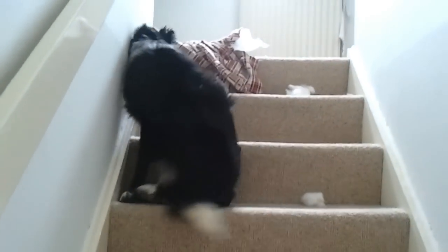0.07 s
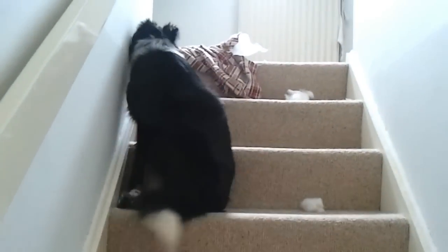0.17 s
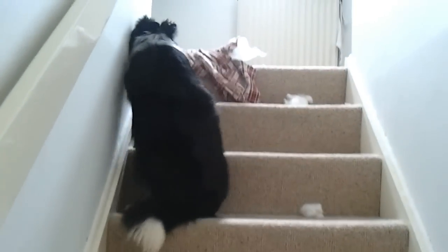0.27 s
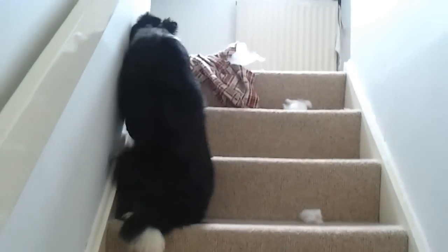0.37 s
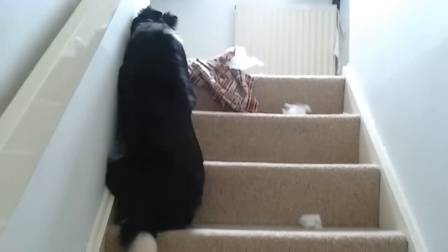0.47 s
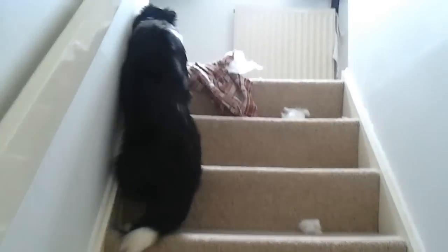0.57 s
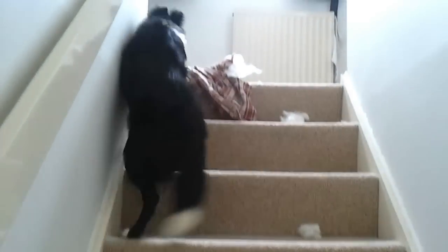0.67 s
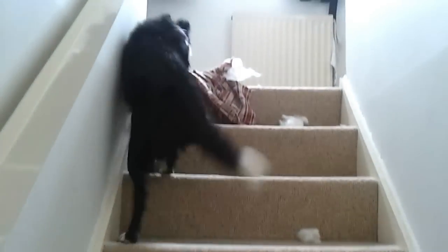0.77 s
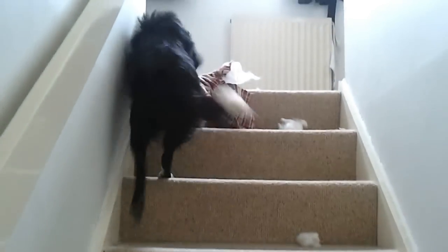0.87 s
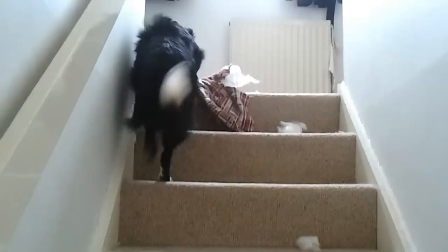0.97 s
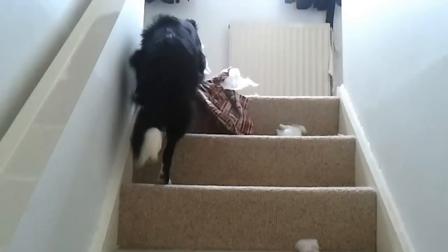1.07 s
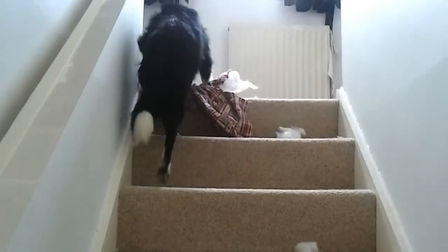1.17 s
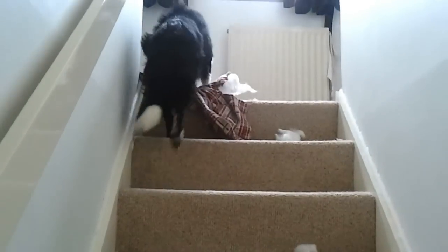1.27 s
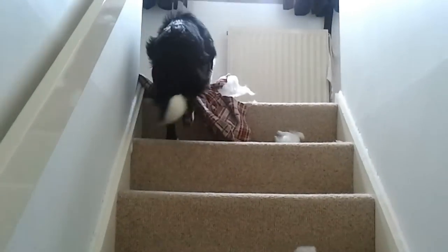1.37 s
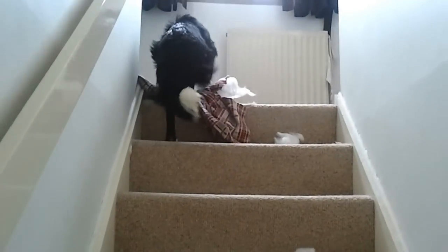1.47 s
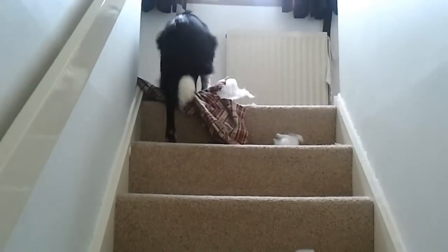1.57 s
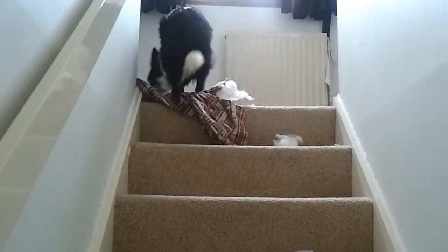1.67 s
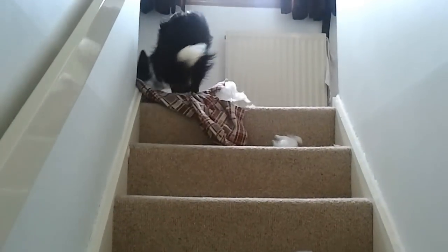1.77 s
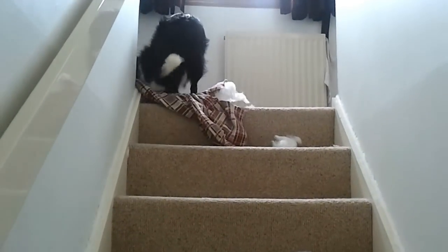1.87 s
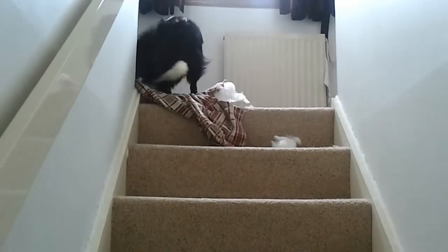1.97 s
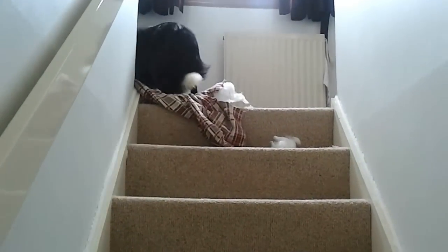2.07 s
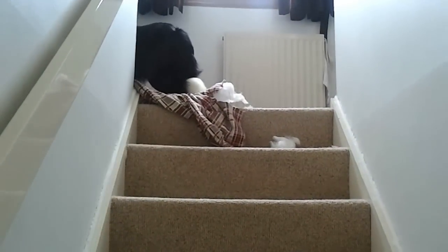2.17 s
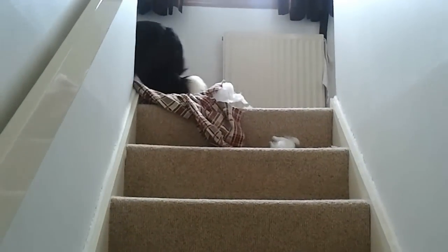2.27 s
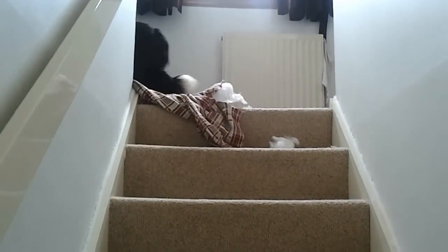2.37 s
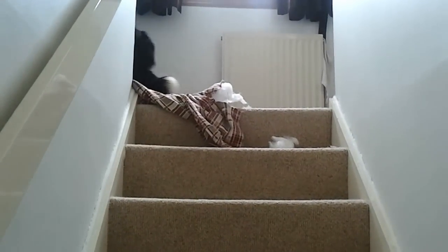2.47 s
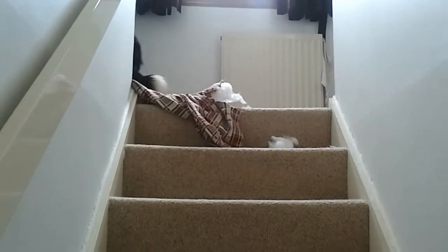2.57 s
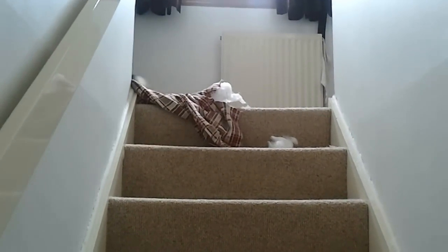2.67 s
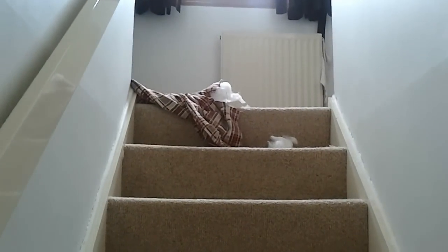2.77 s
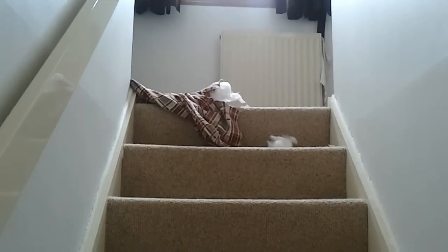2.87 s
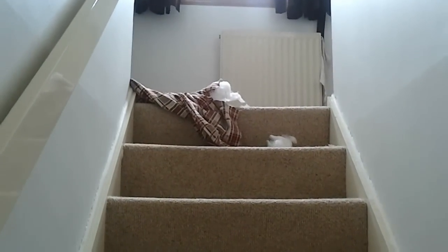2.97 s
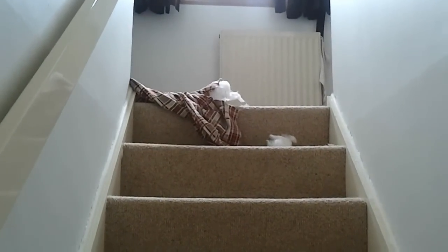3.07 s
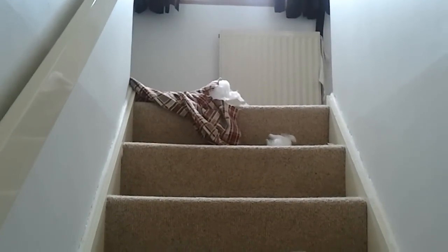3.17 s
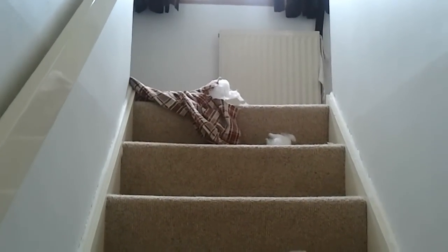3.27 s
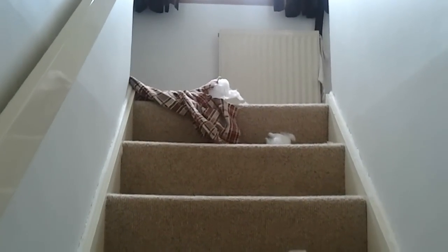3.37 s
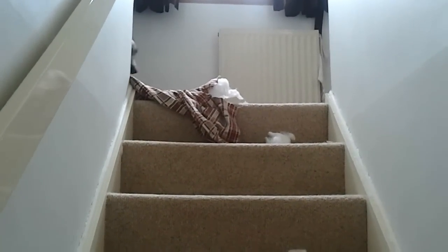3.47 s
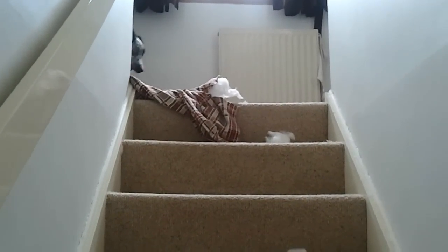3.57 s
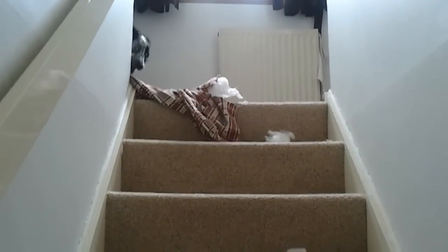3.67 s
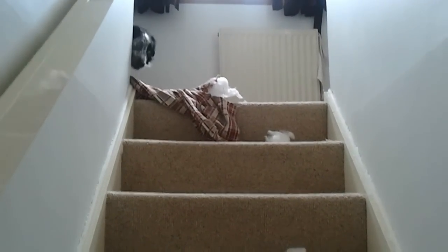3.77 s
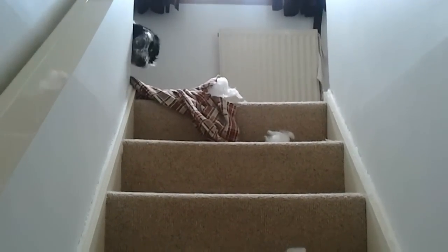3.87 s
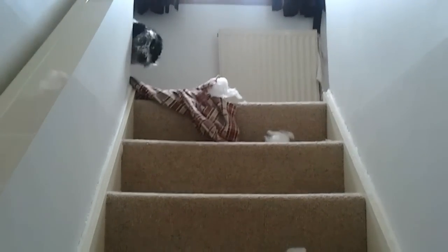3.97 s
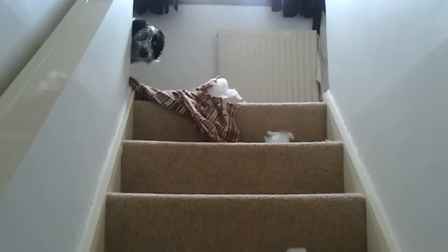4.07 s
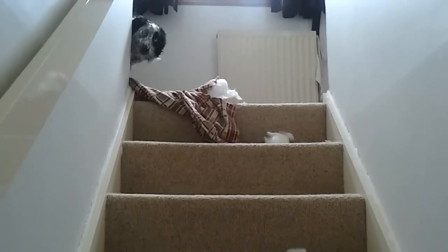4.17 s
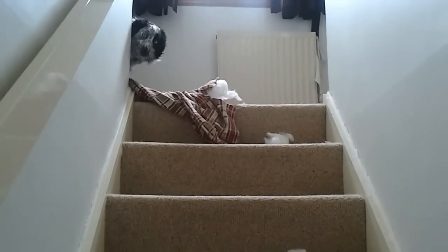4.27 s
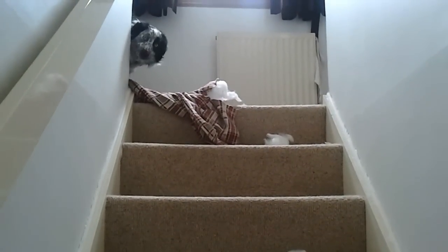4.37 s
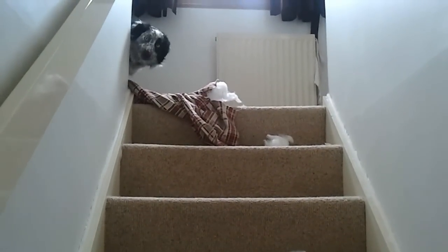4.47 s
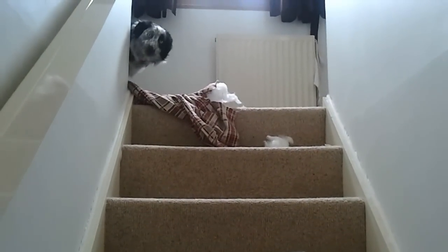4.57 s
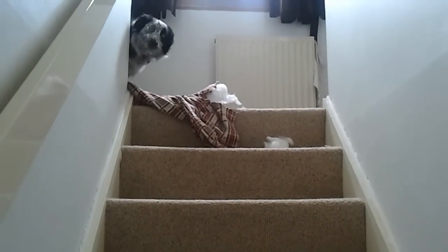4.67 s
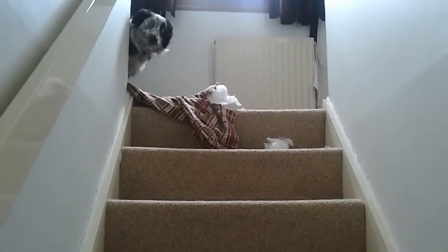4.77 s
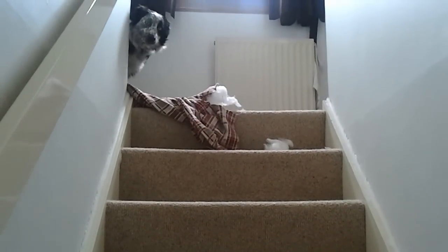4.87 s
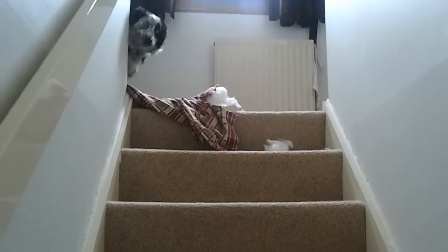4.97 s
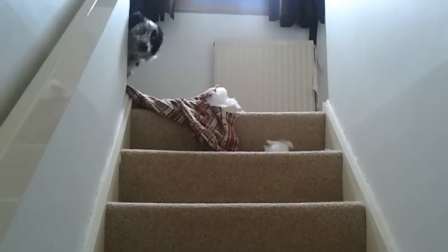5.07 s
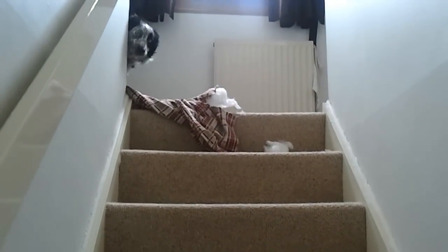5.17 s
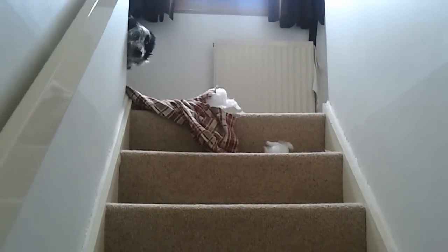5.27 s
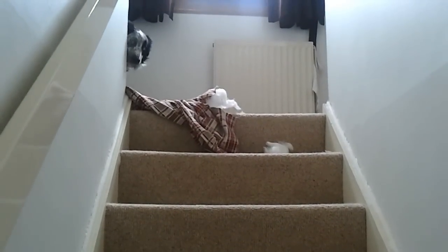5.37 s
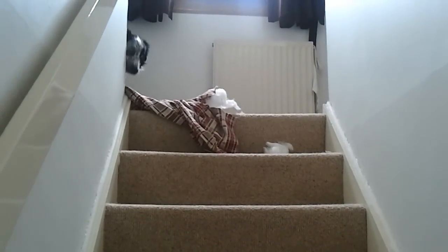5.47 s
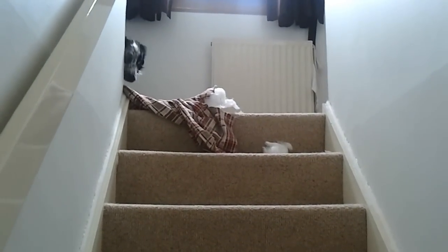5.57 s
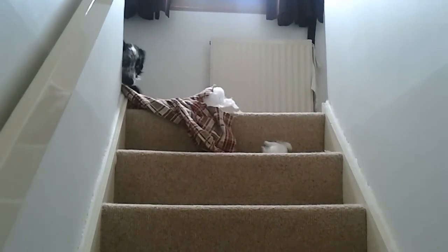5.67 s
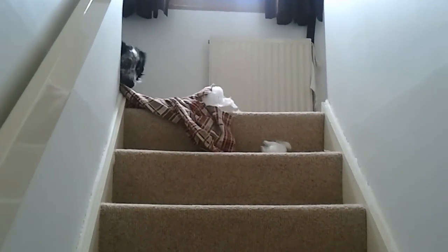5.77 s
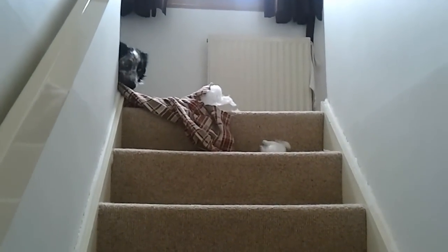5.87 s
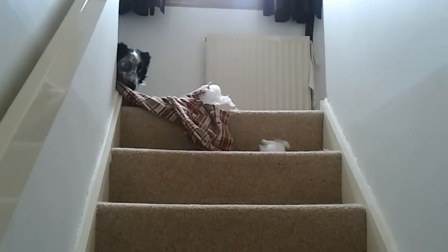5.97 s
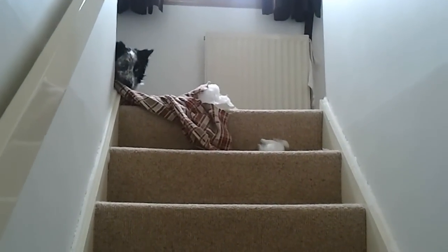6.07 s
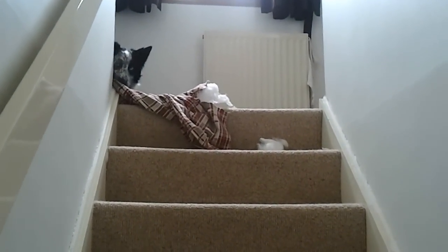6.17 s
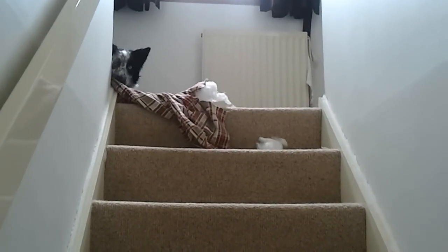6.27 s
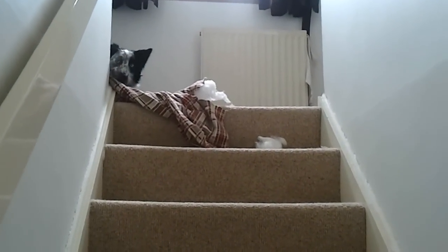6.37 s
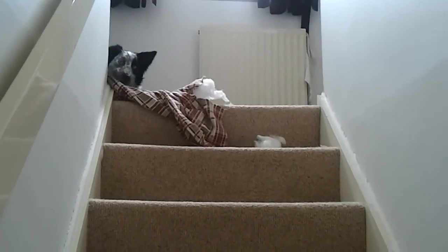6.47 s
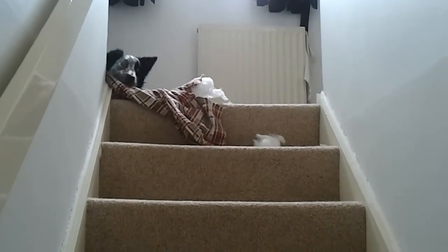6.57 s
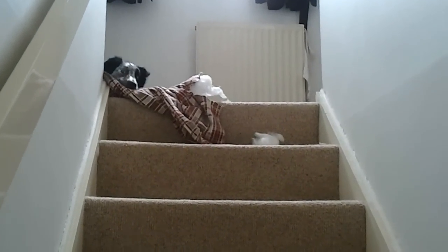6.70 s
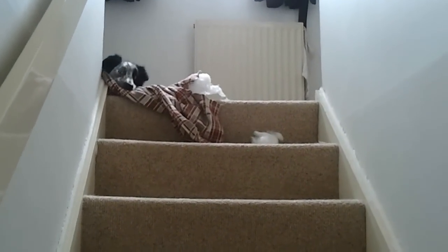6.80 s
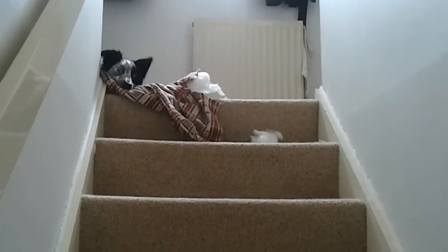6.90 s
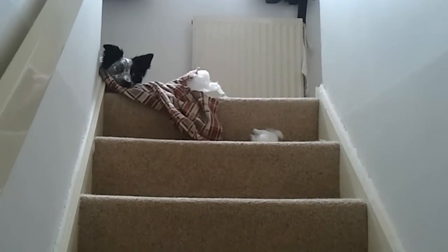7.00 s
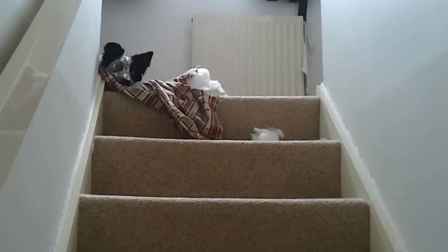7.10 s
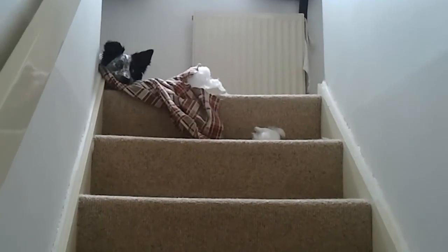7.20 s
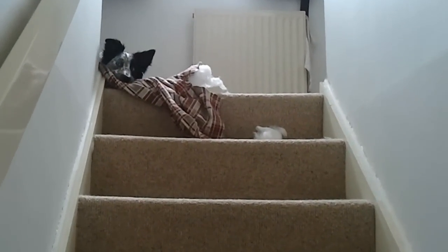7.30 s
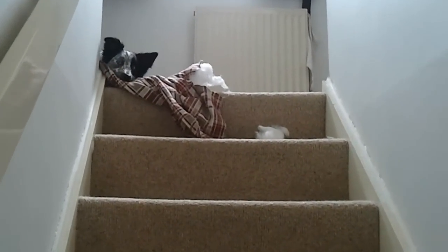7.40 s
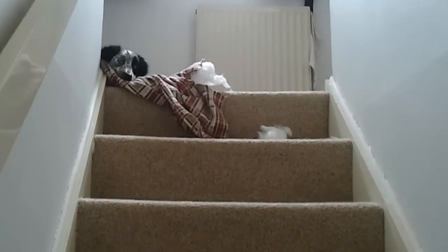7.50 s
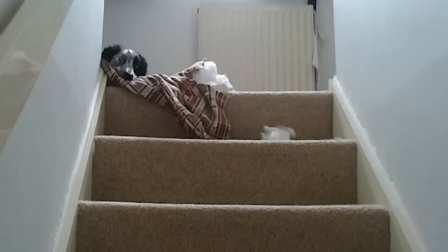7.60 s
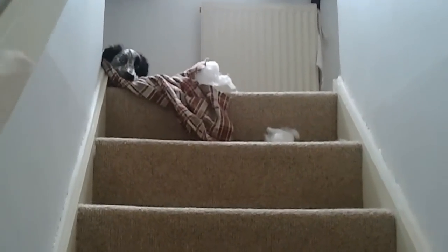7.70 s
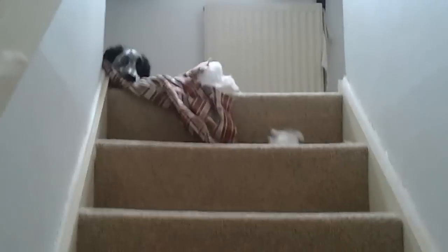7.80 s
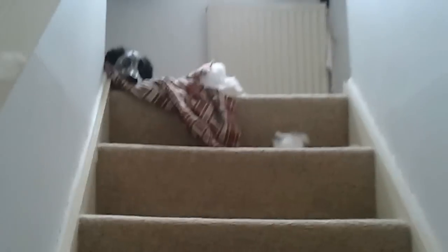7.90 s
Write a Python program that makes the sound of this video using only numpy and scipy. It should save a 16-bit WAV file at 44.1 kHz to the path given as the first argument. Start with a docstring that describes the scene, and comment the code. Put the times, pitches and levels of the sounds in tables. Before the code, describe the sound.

Heavy, irregular paw thuds climb a carpeted staircase and stop; slow dull pats on a step follow, with small camera ticks and hiss.

```python
"""Paws thump up carpeted wooden stairs in a quiet house: a dog climbs, claws and coat scuffing the carpet and wall.
Then soft, even pats, probably a hand on a step calling it back, sound in the narrow stairwell.
The hand-held camera ticks and knocks now and then over a steady hiss, and cloth rustles softly near the end.
Blows are ringing wood modes and filtered noise echoes, rubs are clumped noise under a swell and fade,
ticks are short decaying modes with a few noise snaps, and the hiss is coloured noise."""
import sys
import numpy as np
from scipy import signal
from scipy.fft import rfft, irfft
from scipy.io import wavfile
from scipy.ndimage import uniform_filter1d

SR = 44100
rng = np.random.default_rng(int(sys.argv[2]) if len(sys.argv) > 2 else 0)


def file_out(sig):
    """Save sig as 16-bit WAV at sys.argv[1]."""
    # one column per channel
    cols = np.atleast_2d(sig).T
    # limit, then scale
    lim = np.clip(cols, -1, 1)
    pcm = np.round(lim * 32767).astype(np.int16)
    wavfile.write(sys.argv[1], SR, pcm)


N = 350103
T = np.arange(SR // 2) / SR  # half a second, the span of one blow or rub

# Footfalls on the carpeted stairs, and from 5.3 s a few dull knocks, probably from handling the camera.
# Each row: start in seconds, thud in dB, thud decay in seconds,
# hardness from 0 (for a paw, flat pad in the pile) to 1 (toes on the nosing), boom of the tread in dB,
# main tread mode in Hz, knock of the riser in dB, main riser mode in Hz, ring of the whole staircase in dB.
THUMPS = [(.037, -54, 0.027, 0.03, -72, 143, -52, 355, -60),
          (.103, -49, 0.034, 1, -62, 129, -47.5, 483, -56),
          (.372, -43.5, 0.055, 0.33, -47, 168, -50, 447, -57),
          (.446, -44.5, .005, 0.86, -60, 140, -40.5, 473, -57.5),
          (.473, -48, .014, 0.13, -40, 172, -39, 583, -46.5),
          (.538, -51, .054, 0.78, -42, 138, -62, 483, -60),
          (.572, -49.5, 0.066, 0.76, -45.5, 125, -67, 494, -54),
          (.667, -31.5, 0.02, 0.03, -30.5, 179.2, -38.5, 311.4, -32),
          (.689, -43, 0.03, 0.031, -33.5, 118.7, -40, 406, -43),
          (.956, -42, 0.018, .62, -44, 130, -42.5, 489, -49),
          (.965, -38.5, 0.0097, 0.66, -46, 140, -45, 505, -46),
          (1.006, -38.5, 0.027, 0.17, -46, 120, -46, 392, -45),
          (1.389, -40.5, 0.029, .79, -60, 114.4, -39.5, 488, -41),
          (1.565, -47.5, .017, 1, -62, 164, -42, 500, -52.5),
          (1.722, -28, .028, 0.65, -25.5, 135.8, -25.5, 500, -34),
          (1.816, -35, 0.018, 0.81, -34, 142, -36.5, 495, -50),
          (1.836, -53, .011, 0.2, -42, 185.4, -42.5, 600, -47),
          (2.237, -58, .09, 0.7, -52.5, 89.5, -57, 658, -59.5),
          (2.445, -52, 0.016, .5, -67, 130, -73, 525, -56),
          (2.515, -60, .012, .3, -62, 95, -53.5, 578, -66.5),
          (5.356, -47.5, 0.025, 0.73, -51, 152.6, -54, 490, -53.5),
          (7.251, -57, .012, 0.25, -63, 153, -49.5, 314, -55),
          (7.286, -44, 0.035, 0.7, -49.5, 180.6, -48.5, 477, -49),
          (7.893, -55.5, .045, 0, -56, 77, -66, 346, -56)]
# Modes of a tread. Each row: multiple of the main mode, level in dB, t60 in seconds.
TREAD_MODES = [(1, 17.5, 0.18), (1.29, 9.5, 0.18), (.87, -19, 0.37), (.62, -20, 1), (1.65, -26, .25)]
# Modes of a riser. Each row: multiple of the main mode, level in dB, t60 in seconds.
RISER_MODES = [(0.745, -2, 0.12), (0.879, -6, 0.17), (1, 2.5, 0.084), (1.847, 5.5, 0.068),
               (1.944, 1.5, .085), (2.757, 0, 0.14), (3.863, 5.5, 0.058)]
# Spectrum of the dull thud. Each row: frequency in Hz, level in dB.
THUD_SPECTRUM = [(30, -21), (85, -3), (170, 3), (260, -2.5), (370, 2), (480, 4.5), (620, 8.5), (1000, -11),
                 (8000, -7)]
# Spectrum of the slap on top. Each row: frequency in Hz, level in dB.
SLAP_SPECTRUM = [(60, -40.5), (350, -20.5), (600, -1), (950, 3), (1300, -3), (1850, -9), (2800, -14.5),
                 (8000, -25)]
SOFT_EDGE_HZ, HARD_EDGE_HZ = 292, 890  # a harder blow gives a brighter thud
SOFT_SLAP_DB, HARD_SLAP_DB = -32, 9  # and more slap, relative to the thud
GRAZE_DB, GRAZE_S = -10, 0.0027  # short rub with the slap: level relative to the slap of a light blow, fade
PRESS_DB = -39  # a thud above this level packs the pile
SKID_DB_PER_DB = 1.14  # and drives the claws in harder: extra graze per dB above it


def thumps():
    """A paw's weight rings tread and riser under a dull thud and slap; the late handling knocks use the same model."""
    out = np.zeros(N)
    flight = staircase(rise_cycles=1.3)
    for s, thud_db, decay_s, hardness, boom_db, tread_hz, knock_db, riser_hz, ring_db in THUMPS:
        edge_hz = between(SOFT_EDGE_HZ, HARD_EDGE_HZ, hardness)
        slap_db = thud_db + between(SOFT_SLAP_DB, HARD_SLAP_DB, hardness)
        graze_db = slap_db + GRAZE_DB + SKID_DB_PER_DB * max(thud_db - PRESS_DB, 0)

        tread = ring([(tread_hz * k, db, t60) for k, db, t60 in TREAD_MODES])
        boom = tread * (1 - np.exp(-T / 0.0049))
        thud_echoes = stairwell(decay_s, tail_db=-9.0, rise_cycles=0.33)
        thud = colour(thud_echoes, THUD_SPECTRUM, edge_hz, steep=3.67)
        slap_echoes = stairwell(early_s=0.0077, tail_db=-12.5, rise_cycles=0.39)
        slap = colour(slap_echoes * (1 - np.exp(-T / 0.003)), SLAP_SPECTRUM)
        riser = ring([(riser_hz * k, db, t60) for k, db, t60 in RISER_MODES])
        panel = riser * (1 - np.exp(-T / 0.0013))
        # flat spectra here: only the edge shapes the wood's treble
        knock = colour(panel, [(1, 0.015)], edge_hz * 1.31, steep=3.34)
        wood = colour(flight, [(1, 0.006)], edge_hz * 0.85, steep=3.46)

        add(out, s, sized(boom, boom_db) + sized(thud, thud_db))
        add(out, s, sized(knock, knock_db) + sized(slap, slap_db))
        add(out, s, rub(graze_db, GRAZE_S, tilt_db=-1.5))
        add(out, s, sized(wood, ring_db))
    return out


# Short rubs: paw or flank on carpet and wall, later handling and cloth.
# Each row: start in seconds, level in dB, fade in seconds, tilt in dB per octave.
RUBS = [(0.016, -38, 0.0023, 14.5), (.100, -36, 0.013, 2), (.304, -40.5, 0.042, 0.5),
        (0.548, -35.5, 0.026, 10), (0.702, -37.5, 0.034, -2), (0.988, -40.5, 0.0031, 0),
        (1.015, -45.5, 0.028, -2.5), (2.099, -56, 0.16, 4.5), (3.509, -46, 0.037, 11.5),
        (5.357, -46.5, 0.011, 1), (7.287, -49.5, 0.008, 1), (7.392, -54.5, .003, 1), (7.915, -50, 0.049, 2)]
# Short snaps: claws in the pile, and the crisp snap of the camera ticks at .879 and 5.385.
# Each row: start in seconds, peak in dB.
SNAPS = [(.105, -18), (0.3122, -35), (.690, -27), (0.7194, -38), (.879, -26.5), (0.99, -39), (1.727, -19.5),
         (1.822, -31), (5.385, -31)]


def rubs_and_snaps():
    """Rubs are swelling and fading friction noise; snaps are noise bursts that die away in about a millisecond."""
    out = np.zeros(N)
    for s, db, fade_s, tilt_db in RUBS:
        add(out, s, rub(db, fade_s, tilt_db))
    for s, db in SNAPS:
        burst = rng.standard_normal(len(T)) * np.exp(-T / 0.00055)
        snap = colour(burst, RUB_SPECTRUM, tilt_db=-1.0)
        add(out, s, peaked(snap, db))
    return out


# Spectrum shared by rubs and snaps. Each row: frequency in Hz, level in dB.
RUB_SPECTRUM = [(60, -22), (400, -15), (900, 2), (2000, 3), (2700, 1.5), (3800, 2), (5200, -1),
                (6500, -1.5), (8000, -16.5)]
SWELL_S, SWELL_SHARE = 0.001, 0.18  # a rub swells for a short time plus this share of its fade


def rub(db, fade_s, tilt_db=0):
    """One rub of friction noise: the longer it lasts, the slower it swells."""
    friction = drag(SWELL_S + SWELL_SHARE * fade_s, fade_s, grain_db=0.5, tail_db=1, t60=0.24)
    return sized(colour(friction, RUB_SPECTRUM, tilt_db=tilt_db), db)


# Two close modes of a creaking tread. Each row: frequency in Hz, level in dB, t60 in seconds.
CREAK_MODES = [(1030, 2.5, 0.016), (1290, -2, 0.016)]
# a tread creaks faintly as the dog pushes off
CREAK_S, CREAK_FADE_S, CREAK_DB = 1.336, 0.04, -48.5
CREAK_SCUFF_DB = -52.5  # the paw scrapes the pile as it pushes


def creak():
    """A brief stick-slip in the wood, heard through two close modes, with a light scrape of the paw."""
    out = np.zeros(N)
    slips = drag(SWELL_SHARE * CREAK_FADE_S, CREAK_FADE_S, grain_db=1.5, tail_db=-3, t60=0.26)
    wood = signal.oaconvolve(slips, ring(CREAK_MODES))[:len(T)]
    add(out, CREAK_S, sized(wood, CREAK_DB) + rub(CREAK_SCUFF_DB, CREAK_FADE_S))
    return out


# the coat rubs hard while the dog leans on the wall, then softly until it is round the corner
LEAN_DB, FREE_DB = -49.5, -64  # levels about which the rub wavers
LEAN_END_S, GONE_S, RELEASE_S = 0.86, 2.5, 0.34  # each change starts at its time and lasts RELEASE_S


def coat():
    """Fur slides unevenly along the wall, with a low shuffle from the moving body."""
    t = np.arange(N) / SR
    knots = np.arange(0, t[-1], .025)
    uneven_db = 2 * np.interp(t, knots, rng.standard_normal(len(knots)))
    spectrum = [(30, -2.5), (130, 1.5), (400, -2.0), (1200, -2.5),
                (4000, -7.5), (6500, -7.5), (8000, -20.5)]  # (Hz, dB)
    rustle = colour(rng.standard_normal(N), spectrum)
    leaning = np.clip(1 - (t - LEAN_END_S) / RELEASE_S, 0, 1)
    present = np.clip(1 - (t - GONE_S) / RELEASE_S, 0, 1)
    return evened(rustle) * amp(between(FREE_DB, LEAN_DB, leaning) + uneven_db) * present


# Soft pats on one step, probably by a hand. Each row: start in seconds, knock in dB,
# treble edge in Hz (a firmer pat is brighter), brush of skin on the pile in dB.
HAND_PATS = [(2.621, -35, 870, -49.5), (3.142, -40, 615, -57), (3.674, -46.5, 420, -58),
             (4.207, -32, 970, -53), (4.718, -37.5, 710, -53.5), (5.232, -38, 625, -59),
             (5.786, -44.5, 428, -55.5)]
# Spectrum of a pat along the stairwell path. Each row: frequency in Hz, level in dB.
PAT_SPECTRUM = [(30, -38), (70, -21.5), (110, -12.5), (170, -2.5), (240, -1), (310, -1.5), (390, -0.5),
                (520, -5.5), (640, 1.5), (860, -0.5), (1200, -1.5), (2000, -6.5), (8000, -23)]
# Spectrum of the palm's first contact. Each row: frequency in Hz, level in dB.
SMACK_SPECTRUM = [(150, -28.5), (400, -2), (640, 6.5), (1000, -2.5), (1500, -5), (5000, -8)]
PAT_DIRECT_DB = -9  # the straight path, relative to the echoes
PAT_RING_DB, SMACK_DB = -1, 3  # ring of the wood and first contact, relative to straight path plus echoes
BRUSH_LEAD_S, BRUSH_S, BRUSH_TILT_DB = 0.0033, 0.019, 6  # skin brushes just before: lead, fade, dB per octave


def pats():
    """Every pat lands on the same spot, so all share one ring and one set of echoes."""
    out = np.zeros(N)
    direct = signal.unit_impulse(len(T)) * amp(PAT_DIRECT_DB)
    path = direct + stairwell(early_s=0.04, tail_db=-4, rise_cycles=3.3, hold_s=0.049)
    contact = colour(stairwell(early_s=0.0099, tail_db=-25, rise_cycles=0.72), SMACK_SPECTRUM)
    step = sized(colour(path, PAT_SPECTRUM), 0)
    step += sized(staircase(rise_cycles=7.4), PAT_RING_DB)
    step += sized(contact, SMACK_DB)
    for s, db, edge_hz, brush_db in HAND_PATS:
        add(out, s, sized(colour(step, [(1, 0.0068)], edge_hz, steep=2.47), db))
        add(out, s - BRUSH_LEAD_S, rub(brush_db, BRUSH_S, BRUSH_TILT_DB))
    return out


# Spectrum of the cloth. Each row: frequency in Hz, level in dB.
CLOTH_SPECTRUM = [(80, -6.5), (400, 2), (900, -1.5), (1900, -4.5), (3300, -0.5), (4800, -3), (6800, -6.5),
                  (8000, -22)]
# a soft rustle of cloth, probably a sleeve: start, fullest moment, end, level at full speed
SLEEVE_S, SLEEVE_PEAK_S, SLEEVE_END_S, SLEEVE_DB = 7.29, 7.66, 8.04, -52.5


def sleeve():
    """Cloth slides softly: fine fibre snaps swell with the speed of the movement and die away."""
    t = np.arange(N) / SR
    moments = [SLEEVE_S, SLEEVE_PEAK_S, SLEEVE_END_S]
    speed = np.interp(t, moments, [0.55, 1, .25], left=0, right=0)
    folds = evened(uniform_filter1d(rng.standard_normal(N), size=900))
    clumps = evened(uniform_filter1d(rng.standard_normal(N), size=60))
    snaps = rng.standard_normal(N) * amp(0.9 * folds + 1.4 * clumps)
    return amp(SLEEVE_DB) * speed * evened(colour(snaps, CLOTH_SPECTRUM))


# Ticks in the camera's case, right at the microphone. Each row: start in seconds, peak in dB.
CASE_TICKS = [(0.881, -35.5), (5.0305, -18.5), (5.3836, -25.5), (5.904, -35), (7.2608, -16.5)]
# Modes of the case. Each row: frequency in Hz, level in dB, t60 in seconds.
CASE_MODES = [(610, -7.5, 0.012), (1580, -7.5, 0.0094), (3540, 2, 0.0037), (4800, -25, .005),
              (5940, 13, 0.0032), (7070, 4, 0.003)]


def ticks():
    """The case rings for a few milliseconds right at the microphone, with no room."""
    out = np.zeros(N)
    tick = ring(CASE_MODES) * (1 - np.exp(-T / 0.0005))
    for s, db in CASE_TICKS:
        add(out, s, peaked(tick, db))
    return out


# Spectrum of room tone and hiss. Each row: frequency in Hz, relative level in dB per Hz.
HISS_SPECTRUM = [(15, -67), (25, -18.5), (120, -7), (156, -2.5), (229, -5.5), (291, -1.5), (408, -3.5),
                 (600, -5.5), (770, -4.5), (1860, -10), (5770, -12), (7890, -22.5), (10300, -56)]


def hiss():
    """Steady room tone and microphone hiss: coloured noise at one level."""
    return amp(-54.5) * evened(colour(rng.standard_normal(N), HISS_SPECTRUM))


# The wooden staircase, rung under every thump and pat. Each row: frequency in Hz, level in dB.
STAIRCASE_MODES = [(114, -4), (179, 2), (218, -3), (242, -3.5), (290, 0), (310, 2.5), (341, -8.5),
                   (387, -7.5), (409, 3), (469, 0), (496, 0.5), (533, -3), (625, -4.5), (646, 0.5),
                   (699, 1.5), (728, -2.5), (838, -6), (925, -4), (963, -4.5), (1075, 3), (1130, -5.5),
                   (1343, 0)]
# How long its wood rings. Each row: frequency in Hz, t60 in seconds.
STAIRCASE_DECAY = [(110, 0.36), (1300, 0.25)]


def staircase(rise_cycles):
    """The whole flight rings; each mode takes a few cycles to get going, so the bass arrives last."""
    modes = [(hz, db, read(STAIRCASE_DECAY, hz)) for hz, db in STAIRCASE_MODES]
    return ring(modes, rise_cycles)


# Reverberation between the close walls. Each row: frequency in Hz, t60 in seconds.
STAIRWELL_DECAY = [(100, 0.65), (300, 0.28), (700, 0.34), (2000, 0.34), (7000, 0.17)]


def stairwell(early_s, tail_db, rise_cycles, hold_s=0):
    """Path from one spot: dense early echoes, then a tail that may hold first; bass builds up later than treble."""
    noise = rfft(rng.standard_normal(len(T)))
    hz = np.fft.rfftfreq(len(T), 1 / SR)
    edges = np.r_[0, np.geomspace(100, 9000, 12)]
    late = np.maximum(T - hold_s, 0)
    out = np.zeros(len(T))
    for lo, hi in zip(edges, edges[1:]):
        centre = (lo + hi) / 2
        tail = amp(tail_db - 60 * late / read(STAIRWELL_DECAY, centre))
        fade = np.hypot(np.exp(-T / early_s), tail)
        rise = 1 - np.exp(-T * centre / rise_cycles)
        band = irfft(noise * (hz >= lo) * (hz < hi), len(T))
        out += evened(band * fade * rise) * np.sqrt(hi - lo)
    return out / np.linalg.norm(out)


def ring(modes, rise_cycles=0):
    """Struck modes (Hz, dB, t60 s), neighbours swinging in opposite directions."""
    out = np.zeros(len(T))
    for k, (hz, db, t60) in enumerate(modes):
        rise = 1 - np.exp(-T * hz / (rise_cycles + 1e-9))
        out += (-1) ** k * amp(db - 60 * T / t60) * rise * np.sin(2 * np.pi * hz * T)
    return out


def drag(swell_s, fade_s, grain_db, tail_db, t60):
    """Friction: clumps of tiny snaps swell and fade, and the walls smear them into a smooth tail."""
    stroke = np.minimum(T / swell_s, 1) * np.exp(-np.maximum(T - swell_s, 0) / fade_s)
    clumps = evened(uniform_filter1d(rng.standard_normal(len(T)), size=60))
    snaps = evened(rng.standard_normal(len(T)) * amp(grain_db * np.clip(clumps, -2, 2)))
    keep = amp(-60 / (t60 * SR)) ** 2  # share of the room's power left after one sample
    lingering = np.sqrt(signal.lfilter([1 - keep], [1, -keep], stroke ** 2))
    return snaps * stroke + amp(tail_db) * lingering * rng.standard_normal(len(T))


def colour(x, points, edge_hz=SR, steep=6, tilt_db=0):
    """Causal minimum-phase filter: a spectrum, tilted about 2 kHz and rolled off above an edge."""
    hz = abs(np.fft.fftfreq(4096, 1 / SR)) + 1
    octaves = np.log2(np.maximum(hz, 300) / 2000)  # the tilt stops below 300 Hz
    gain = amp(read(points, hz) + tilt_db * octaves) / np.hypot(1, (hz / edge_hz) ** steep)
    log_gain = np.log(gain + 1e-5)
    taps = np.fft.ifft(np.exp(np.conj(signal.hilbert(log_gain)))).real
    return signal.oaconvolve(x, taps[:len(taps) // 2])[:len(x)]


def between(soft, hard, hardness):
    """Blends a property of a soft contact into that of a hard one."""
    return soft + (hard - soft) * np.clip(hardness, 0, 1)


def amp(db):
    """Decibels to gain."""
    return 10 ** (np.asarray(db) / 20)


def evened(x):
    """Scales to rms 1."""
    return x / np.sqrt(np.mean(x ** 2) + 1e-20)


def sized(x, db):
    """Scales a sound so that its loudest 30 ms have this rms level."""
    loudest = uniform_filter1d(x ** 2, size=1323, mode="constant").max()
    return x * amp(db) / np.sqrt(loudest + 1e-20)


def peaked(x, db):
    """Scales a sound to this peak level."""
    return amp(db) * x / abs(x).max()


def read(points, hz):
    """Reads a table on a log-frequency axis."""
    f, value = np.transpose(points)
    return np.interp(np.log(hz + 1), np.log(f + 1), value)


def add(mix, s, sound):
    """Mixes a sound in at time s."""
    part = mix[max(round(s * SR), 0):][:len(sound)]
    part += sound[:len(part)]


def scene():
    """All sources at one microphone."""
    contacts = thumps() + rubs_and_snaps() + creak() + coat() + pats()
    return (contacts + sleeve() + ticks() + hiss())[None]


# The microphone's colour. Each row: frequency in Hz, level in dB.
MIC_COLOUR = [(700, 0), (1350, -1.5), (1880, 2), (2350, -1), (3600, -1.06), (4800, -1)]


def record(dry):
    """The microphone's colour, then the recorder's band limit."""
    band_limit = signal.firwin(301, 7800, window=("kaiser", 8), fs=SR)  # low-pass edge in Hz
    return signal.oaconvolve(colour(dry[0], MIC_COLOUR), band_limit, "same")[None]


dry = scene()
out = record(dry)
file_out(out)
```